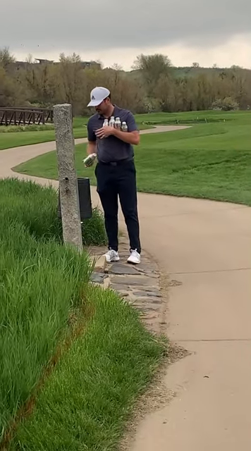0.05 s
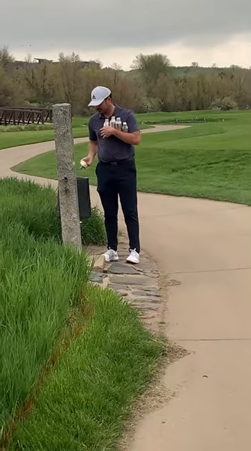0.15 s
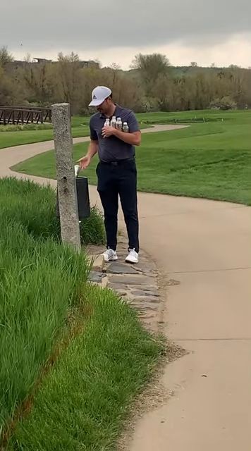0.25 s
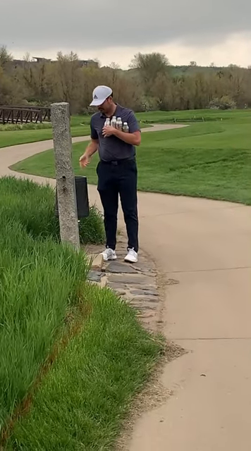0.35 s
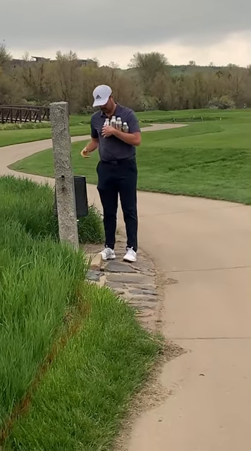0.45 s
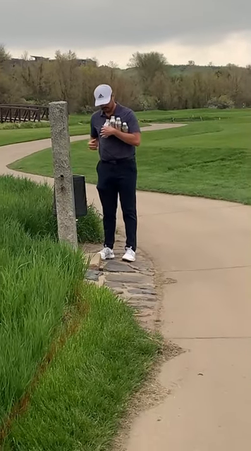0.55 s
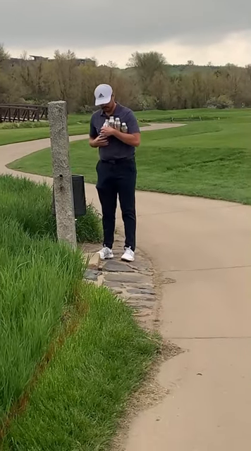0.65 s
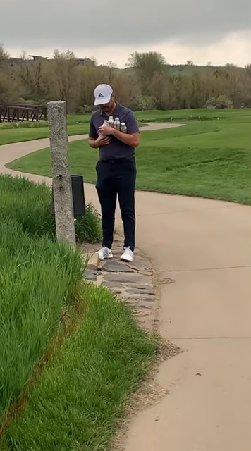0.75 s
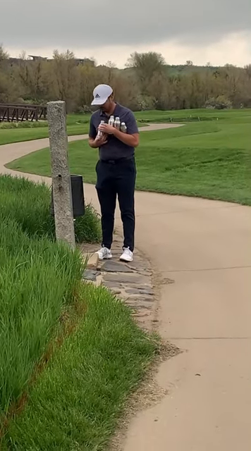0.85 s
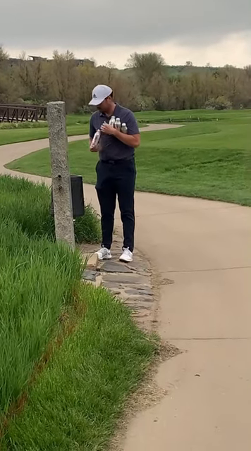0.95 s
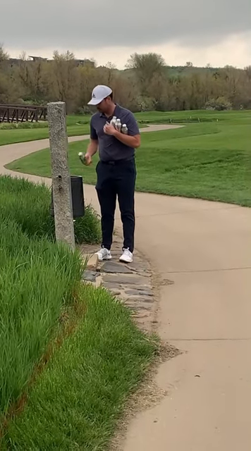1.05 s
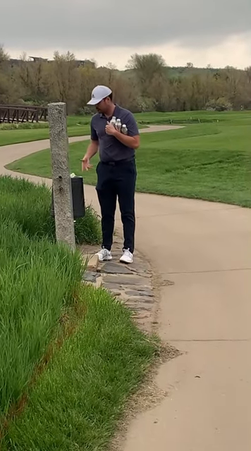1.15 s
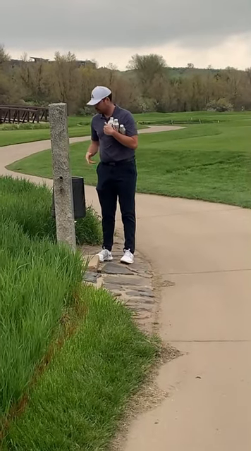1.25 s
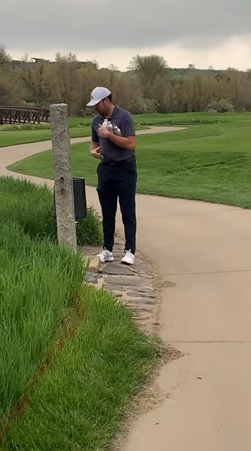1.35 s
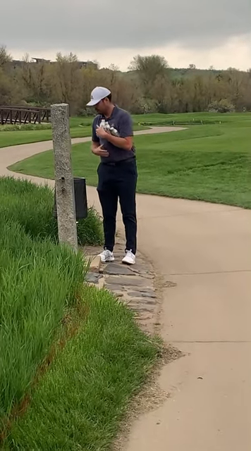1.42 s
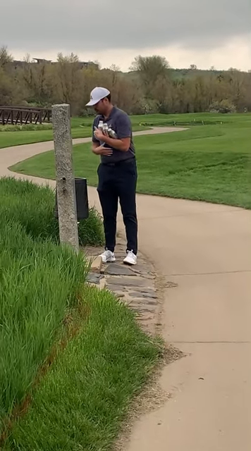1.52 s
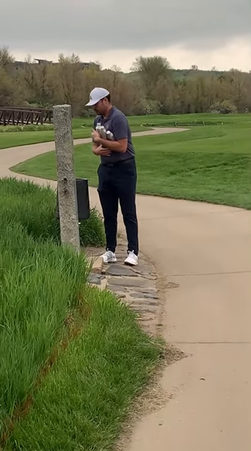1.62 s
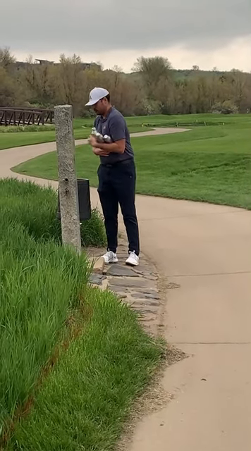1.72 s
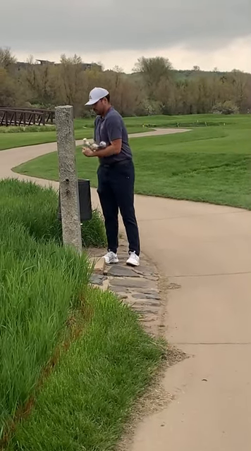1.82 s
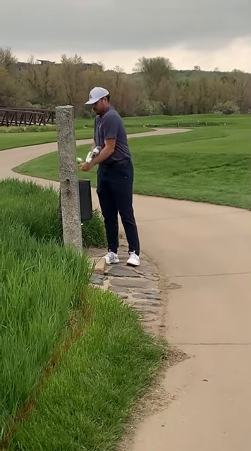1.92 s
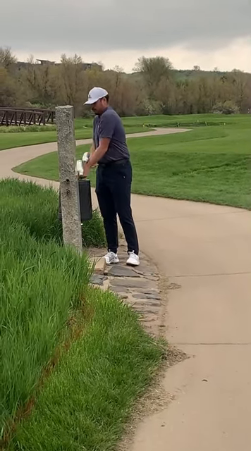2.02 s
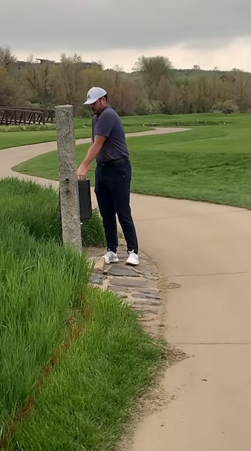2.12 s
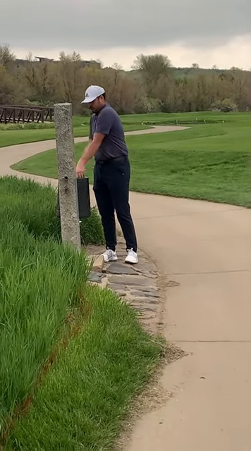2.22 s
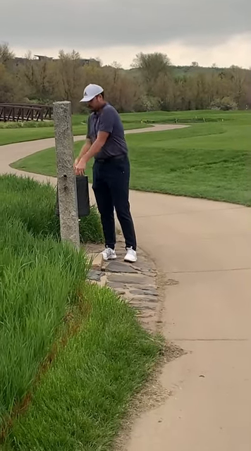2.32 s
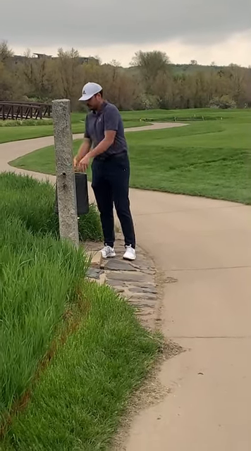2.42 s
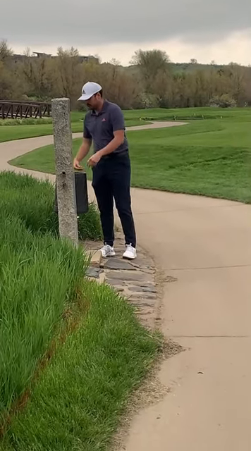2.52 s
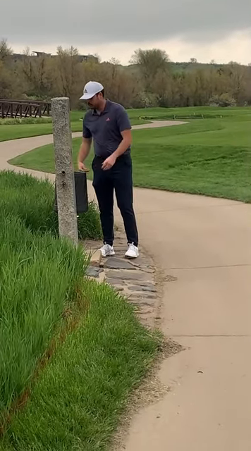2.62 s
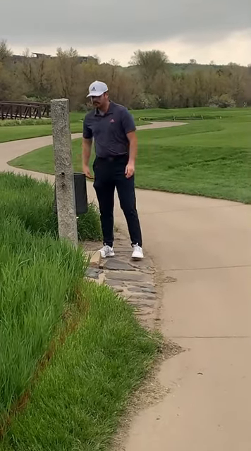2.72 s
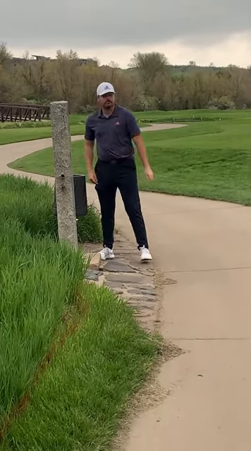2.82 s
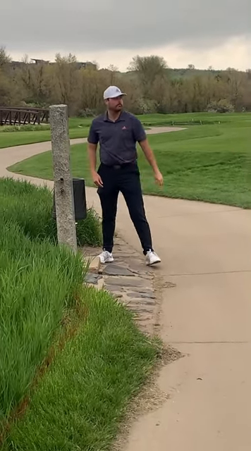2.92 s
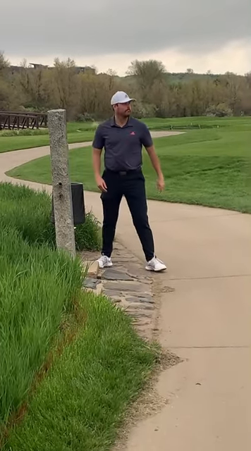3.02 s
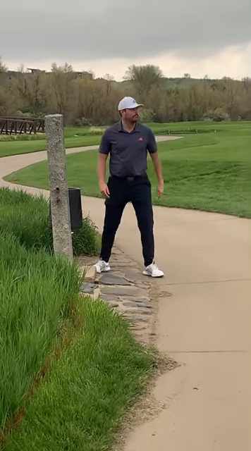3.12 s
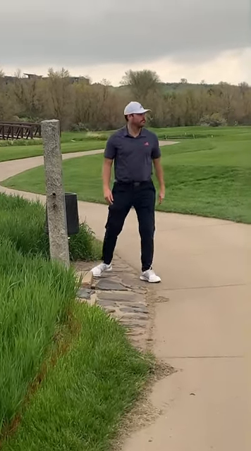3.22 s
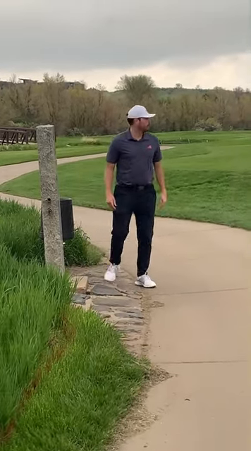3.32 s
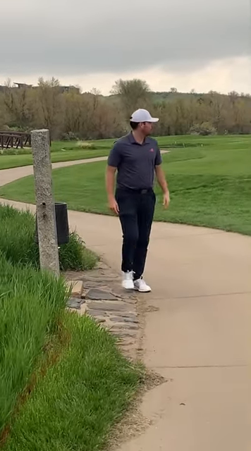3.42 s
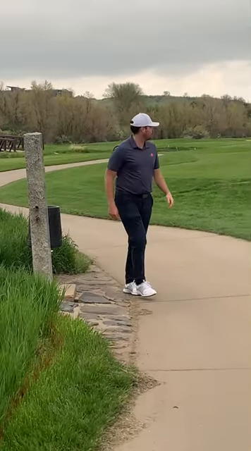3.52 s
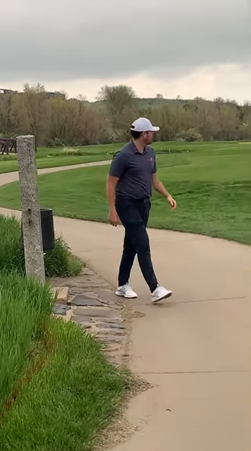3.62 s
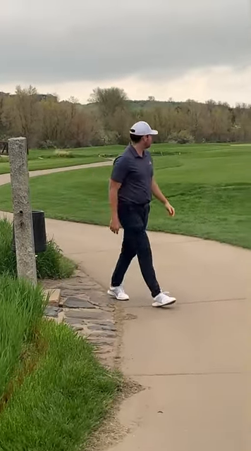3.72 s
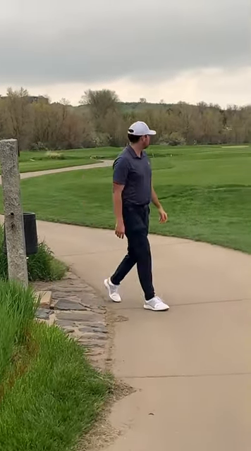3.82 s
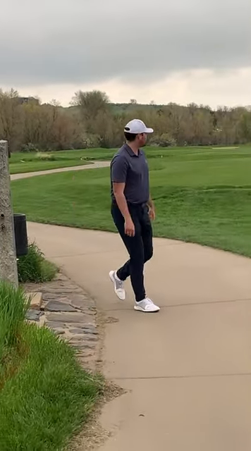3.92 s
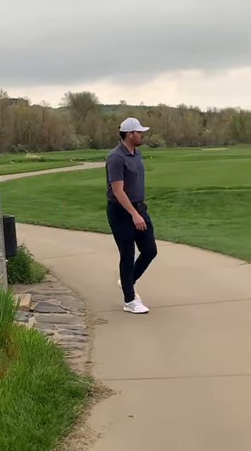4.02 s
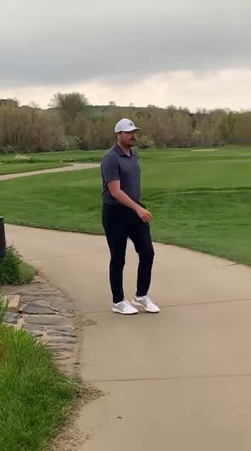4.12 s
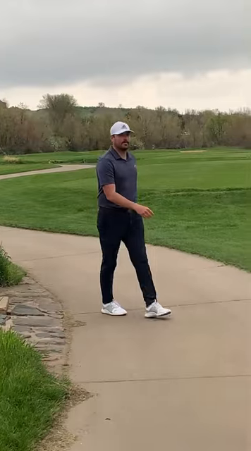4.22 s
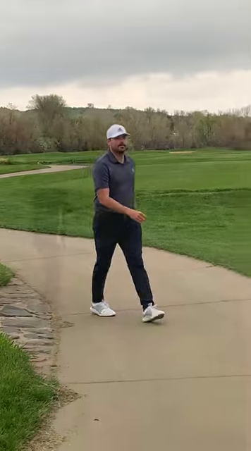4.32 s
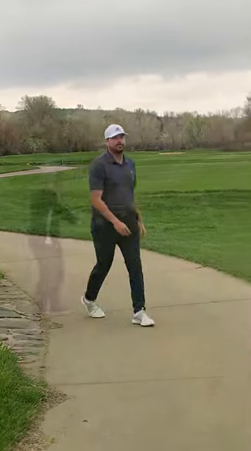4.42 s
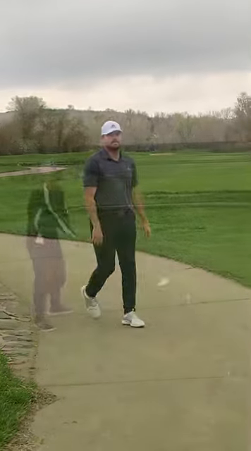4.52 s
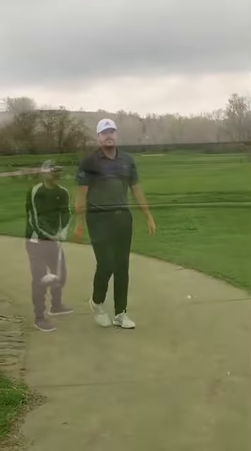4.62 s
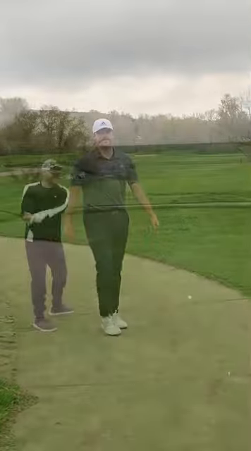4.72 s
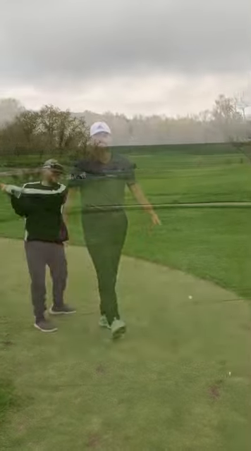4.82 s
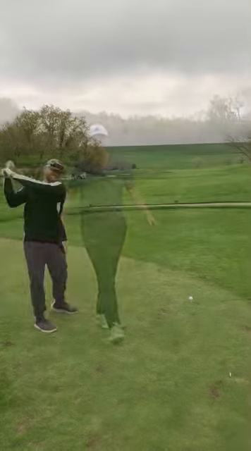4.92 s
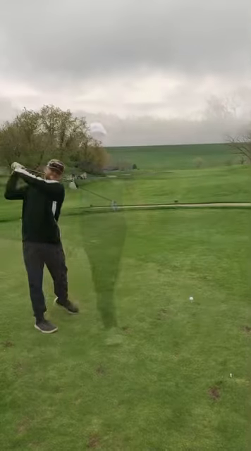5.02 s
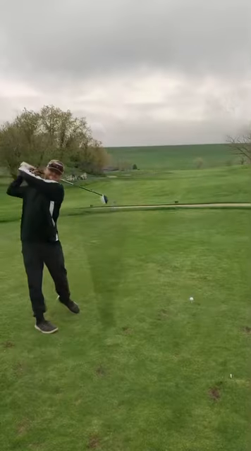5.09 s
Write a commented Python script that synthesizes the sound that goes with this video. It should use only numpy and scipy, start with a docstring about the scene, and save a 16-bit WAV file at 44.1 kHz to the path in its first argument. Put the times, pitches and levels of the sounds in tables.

```python
"""Empty plastic bottles drop into a litter bin on a post, a few metres from a phone, on open grass.
From the start to about 3 s, contact noise rings bottle walls and the bin's hollow, then rattles and slides on.
Gliding tones make birds that call from 0.4 s on, joined by a warble at 2.6 s, a trill at 3 s, chirps at 3.8 s.
At 4.1 s grit noise makes a shoe scuff the path; a soft hiss of filtered noise swells near 4.8 s.
Bands of noise make a low rumble and wind in far trees all along; they fade from 4.18 s on."""
import sys
import numpy as np
from scipy import signal
from scipy.fft import rfft, irfft, next_fast_len
from scipy.io import wavfile
from scipy.ndimage import uniform_filter1d

SR = 44100
rng = np.random.default_rng(int(sys.argv[2]) if len(sys.argv) > 2 else 0)


def file_out(sig):
    """Save sig as 16-bit WAV at sys.argv[1]."""
    # one column per channel
    cols = np.atleast_2d(sig).T
    # limit, then scale
    lim = np.clip(cols, -1, 1)
    pcm = np.round(lim * 32767).astype(np.int16)
    wavfile.write(sys.argv[1], SR, pcm)


N = 227237

# Rumble and far wind. Each row: pitch in Hz, relative level in dB per Hz,
# share that is alike at both ports (0 to 1).
AIR_BANDS = [(21, -2, 1), (39.2, -4.5, 1), (63.2, 3, 1), (129, -7, 0.99), (189.1, -18, 0.98),
             (418, -29.5, 0), (890, -21.5, 0.17), (1790, -37.5, 0.1), (3000, -39.5, 1), (4300, -53, 1),
             (8360, -54, 0.93), (16000, -57, 1)]
AIR_DB, AIR_SWELL_DB, AIR_FLICKER_DB = -50.5, .8, 1.54
FADE_START_S, WIND_FADE_DB_PER_S, RUMBLE_FADE_DB_PER_S = 4.18, -2, -13

# How far the left microphone port leads the right. Each row: pitch in Hz, lead in radians.
PORT_LEAD = [(0, 0), (1290, -0.2), (2580, 1.7), (3790, 1.4), (6370, 6.0), (7490, 6.7), (8350, 9.1),
             (9560, 9.8), (10400, 12.4), (11600, 12.8), (12500, 15.5), (13700, 15.8), (14600, 18.8),
             (16000, 18.9)]
TOP_HZ = 16000  # the phone cuts what lies above

# Two broad resonances of the soft hiss. Each row: pitch in Hz, width in Hz, relative level in dB.
HISS_BANDS = [(3120, 500, -2.5), (1710, 470, -3.5)]
HISS_CENTRE_S, HISS_SPREAD_S, HISS_DB = 4.79, 0.1, -64

# Bird notes, each one smooth glide. Each row: start in seconds, length in seconds, first pitch in Hz,
# middle pitch in Hz, last pitch in Hz, level in dB before flutter, distance and echo.
WHISTLES = [(0.4, 0.049, 2318, 2240, 2190, -74), (0.81, 0.12, 3110, 3040, 2980, -85),
            (0.966, 0.029, 3700, 3540, 3570, -82), (0.885, 0.092, 2720, 2550, 2370, -72.5),
            (1.031, 0.049, 2550, 2540, 2110, -76), (1.32, 0.03, 2900, 2860, 3010, -67),
            (1.375, 0.033, 2678, 2600, 2330, -70), (1.411, 0.049, 4130, 4050, 3960, -85),
            (1.488, 0.038, 2680, 2550, 2240, -72), (1.541, 0.1, 2347, 2410, 2250, -75.5),
            (1.628, 0.038, 2400, 2610, 2850, -70), (1.674, 0.067, 2820, 2680, 2220, -68.5),
            (1.745, 0.059, 3205, 3190, 3150, -69), (2.458, .05, 3140, 3700, 3200, -61),
            (2.577, 0.053, 3080, 3540, 3890, -61), (2.81, .06, 2490, 2350, 2190, -64),
            (2.953, 0.058, 5400, 6050, 5400, -62), (2.975, 0.043, 2480, 2740, 2040, -54.5),
            (3.024, 0.022, 2080, 2065, 1900, -65.5), (3.105, 0.057, 4300, 4800, 4700, -77),
            (3.205, 0.037, 2040, 3190, 2300, -65.5), (3.22, 0.029, 4500, 4840, 4540, -76),
            (3.344, 0.068, 4250, 4660, 4700, -81.5), (3.377, 0.018, 3520, 3000, 2700, -73),
            (3.383, 0.14, 2594, 2394, 2650, -61.5), (3.525, .07, 2770, 2970, 3200, -74),
            (3.572, 0.08, 2360, 2370, 2240, -71.5), (3.698, 0.11, 2300, 2155, 2410, -70),
            (4.118, 0.0394, 2980, 3398, 3550, -59.5), (4.35, 0.045, 2240, 2290, 2040, -75),
            (4.472, 0.051, 2350, 2750, 2130, -71), (4.525, 0.062, 2200, 1900, 1850, -73),
            (4.566, .06, 3750, 3600, 3750, -88.5), (4.921, 0.065, 4550, 4950, 3900, -79),
            (5.016, 0.069, 3370, 3215, 2920, -62.5), (5.117, 0.048, 2300, 2810, 2850, -65.5)]
# Chirps with overtones. Each row: the same columns as the whistles; the pitches are of the second partial.
CHIRPS = [(3.789, .065, 2993, 3750, 3030, -63.5), (3.999, .06, 3030, 3566, 3050, -62.5)]
# Partials of a chirp. Each row: multiple of the given pitch, level in dB.
CHIRP_PARTIALS = [(.5, -14), (1, 0), (1.5, -8)]
# Warbles of a far bird. Each row: start in seconds, length in seconds, middle pitch in Hz,
# level in dB before flutter, distance and echo.
WARBLES = [(2.615, 0.38, 2538, -71), (3.04, 0.31, 2550, -77.5)]
WARBLE_SWING_HZ, WARBLE_SWINGS_PER_S = 112, 40
WARBLE_PARTIALS = ((1, 0), (1.14, -7.5))  # multiple of the pitch, level in dB
NOTE_SWELL_POWER = 0.33  # 0 = flat note, 1 = sine arch
FAR_HZ = 4300  # whistles with a middle pitch above this come from far off
TRILL_START_S, TRILL_GAP_S, TRILL_COUNT = 3.04, .0647, 12
TRILL_HZ = (4200, 3300, 3650)  # first, middle and last pitch of a note, before a small random shift
TRILL_NOTE_S, TRILL_DB, TRILL_SPREAD_DB = .034, -71, 2  # average length and level, random spread
FLOCK_PER_S, FLOCK_END_S = 16, 3.95
FLOCK_HZ, FLOCK_MIN_DB = (2300, 4200), -86  # range of pitches; level of the softest call
NEAR_FLUTTER_DB, FAR_FLUTTER_DB, BIRD_ECHO_S = 1.2, 3.6, 0.023

# Shoe strokes on the path. Each row: start in seconds, attack in seconds, hold in seconds,
# release in seconds, grit level in dB before the sole's resonances.
SCUFF_STROKES = [(4.125, 0.016, 0.01, 0.022, -39.5), (4.17, .01, 0.057, 0.016, -51.5)]
# The loudest stones under the shoe. Each row: time in seconds, noise level in dB before the sole's resonances.
STONES = [(4.162, -27.5), (4.186, -41), (4.212, -48), (4.238, -52.5)]
# Resonances of the sole. Each row: pitch in Hz, width in Hz, level in dB.
SOLE = [(190, 103, 9.5), (640, 130, 6.5), (1200, 160, 4.5), (1710, 154, 10.5), (2620, 140, 3),
        (6600, 2500, -37), (11900, 9800, -30)]

# Thin dry ticks. Each row: time in seconds, peak in dB, centre pitch in Hz.
TICKS = [(0.559, -43.5, 4940), (0.846, -60.5, 3930), (0.993, -61, 2640), (1.915, -60.5, 7200),
         (3.697, -58, 4980), (4.745, -63, 5100), (4.915, -64, 5000)]
TICK_S = 0.0012  # time to the top of a tick's envelope

# Bottles sliding over each other. Each row: start in seconds, hold in seconds, wall level in dB,
# crackle level in dB relative to the walls.
SLIDES = [(0.553, 0.086, -57.5, -14), (1.192, 0.056, -68.5, 23), (1.911, 0.15, -60, -31),
          (2.086, 0.15, -52.5, 6.5), (2.225, 0.14, -49.5, -3), (2.399, 0.12, -51, 2),
          (2.524, 0.044, -78, -1), (2.611, 0.11, -58, -3), (2.77, 0.12, -68, -10)]
SLIDE_ATTACK_S, SLIDE_RELEASE_S, SLIDE_CRACKLE_S = 0.0073, .05, 0.028
SLIDE_RING_SHARE = 0.31  # contact shortens the ring of the walls to this share

# Knocks. Each row: time in seconds, early peak of the bottle walls in dB, bin boom in dB, crack in dB,
# brightest bottle pitch in Hz, rattle in dB, hardness in dB per octave. Boom and crack are relative
# to the wall peak, the rattle to the first contact.
KNOCKS = [(0.009, -33, -6.5, -15, 666, -8, 2.5), (0.053, -39, -0.5, -50, 550, -1.5, 2),
          (0.205, -38.5, -11, -30, 1100, 4, -17), (0.312, -24.5, -8.5, -10.5, 855, -10, -0.5),
          (0.372, -31, -20, -25.5, 1060, -12.5, -3), (0.457, -33.5, -15, -46, 605, -4, -1),
          (0.526, -39.5, -0.5, -9, 760, -19, 7), (0.537, -40, -9.5, -14, 590, 8.5, 9.5),
          (0.56, -33, -7, -12.5, 1080, 5, -11), (0.599, -35, -8, -53, 805, 5, 6.5),
          (0.646, -40, -6.5, -49, 1080, -3, -8), (0.705, -47.5, -1, -25, 710, -9, -13),
          (0.868, -45.5, -17, -7.5, 900, -15, 9.5), (1.154, -23.5, -18.5, -7.5, 810, -8, 3),
          (1.178, -22.5, -23, -9, 1020, -11, 6), (1.195, -21, -45, -6.5, 700, -6, 0.5),
          (1.209, -22, -12, 0, 600, -11, 5.5), (1.234, -30.5, -30, -30, 980, -5.5, -10),
          (1.27, -41.5, 3.5, -30, 1010, -3, 6), (1.336, -39, -22, -20, 970, -4, -8),
          (1.603, -43, -17, -16.5, 1130, 1.5, 2), (1.734, -34.5, -18, -22.5, 990, -13.5, -2),
          (1.764, -40, -30, -21, 940, 16, 7), (1.94, -45.5, -12, -32, 1180, 5, 17.5),
          (2.007, -24, -11, -18.5, 667, -18, -12), (2.091, -32, -14, 1, 1200, -4, 19),
          (2.109, -20.5, -13, -12, 1250, -17, 5.5), (2.124, -27, -13, -4, 717, 6, 5),
          (2.162, -22.5, -8, -3.5, 690, -1, 2.5), (2.178, -32, 4.5, -0.5, 557, -3, 11),
          (2.226, -30, -11, -22, 750, -13, 5.5), (2.255, -33, -38, -3, 780, -9, 7.5),
          (2.271, -27.5, -38, -7, 1110, -12, 10), (2.288, -30, -4, -11, 1070, -3, -13),
          (2.309, -30.5, -3, -15.5, 1090, -8.5, -3.5), (2.352, -38, -0.5, -14, 685, -1, 6),
          (2.407, -21.5, -48, -19, 663, -11, 0.5), (2.424, -32.5, -2, -8, 1280, -15, 8.5),
          (2.462, -35, -20, -39, 700, 5.5, -11), (2.491, -36, 0.5, -49, 1120, -10, 0),
          (2.633, -40.5, 1.5, -11, 980, -4, 13), (2.689, -41, -9, -21.5, 1176, 6, 8),
          (2.851, -37, -4, -23, 1030, -7.5, 5)]
# Ringing modes of the bottle walls. Each row: pitch in Hz, level in dB, time to fall by 60 dB in seconds.
# Every knock shifts pitch and level a little.
BOTTLE_MODES = [(590, -10.5, 0.14), (698, 0.5, 0.036), (802, -5, 0.1), (988, 1, 0.045), (1084, 6.5, 0.023),
                (1228, -1.5, 0.028), (1544, -2.5, 0.022), (1727, -2, 0.042), (2275, -5.5, 0.013),
                (2680, -8.5, 0.037), (3150, -18.5, 0.096), (3770, -33, 0.078)]
# Ringing modes of the bin's hollow. Each row: pitch in Hz, level in dB, time to fall by 60 dB in seconds.
BIN_MODES = [(157.05, 14, 0.4), (254.6, 1, 0.23), (325, -22, .08)]
PEAK_WINDOW = SR // 70  # samples at the start of a knock that set its peak
OWN_PITCH_DB, OWN_PITCH_WIDTH = 9, 0.089  # lift near a bottle's own pitch; width in natural-log pitch
CONTACT_S, RATTLE_RISE_S, RATTLE_S, CRACK_S = 0.0031, 0.0044, 0.036, 0.077
MODE_SPREAD_DB, MODE_SHIFT = 3.36, 0.046  # random spread of level, and of pitch as a share


def undb(db):
    """Turn decibels into a plain factor."""
    return 10 ** (np.asarray(db) / 20)


def unit(x):
    """Scale to an average (RMS) strength of 1."""
    return x / np.sqrt(np.mean(x ** 2))


def ring(x, hz, t60):
    """One mode, struck by x, that falls by 60 dB in t60 seconds."""
    pole = np.exp((2j * np.pi * hz - np.log(1000) / max(t60, .003)) / SR)
    return signal.lfilter([1], [1, -pole], x).imag


def band(x, hz, width):
    """Resonance with gain 1 at its centre."""
    return signal.lfilter(*signal.iirpeak(hz, hz / width, fs=SR), x)


def walk(rate):
    """Slow random curve: levels held for 1 / rate seconds and smoothed twice; spread near 1."""
    k = int(SR / rate)
    steps = np.repeat(rng.standard_normal(N // k + 1), k)
    return unit(uniform_filter1d(uniform_filter1d(steps, k), k)[:N])


def add(out, s, x):
    """Mix x into out from second s on."""
    i = int(s * SR)
    out[i:i + len(x)] += x[:N - i]


def grit(size, spread_db):
    """Dense tiny contacts with a few big ones."""
    return unit(rng.standard_normal(size) * undb(spread_db * rng.exponential(size=size)))


def shape(s, attack_s, hold_s, release_s):
    """Straight rise, hold, exponential release."""
    t = np.arange(N) / SR - s
    return np.clip(t / attack_s, 0, 1) * np.exp(-np.maximum(t - attack_s - hold_s, 0) / release_s)


def echoes(x, decay_s):
    """Scattering off trees: x smeared by a decaying burst of noise."""
    t = np.arange(SR // 4) / SR
    tail = rng.standard_normal(len(t)) * np.exp(-t / decay_s)
    return signal.fftconvolve(x, tail / np.linalg.norm(tail))[:N]


def ports(x, side=1.):
    """Both microphone ports hear one wave, the left one earlier in the treble; side scales the lead."""
    hz, lead = np.transpose(PORT_LEAD)
    size = next_fast_len(N + 4096)
    bins_hz = np.arange(size // 2 + 1) * SR / size
    turn = np.exp(.5j * side * np.interp(bins_hz, hz, lead))
    return irfft(rfft(x, size) * np.array([turn, turn.conj()]), size)[:, :N]


def air():
    """Rumble and wind: half-octave noise bands swell together and flicker alone, partly shared by the ports."""
    shared, apart, swell = 0, 0, walk(1.685)
    fading_s = np.maximum(np.arange(N) / SR - FADE_START_S, 0)
    table = np.array(AIR_BANDS, float)
    for hz in 22 * 2 ** np.arange(0, 9.6, .5):
        db, alike = (np.interp(np.log(hz), np.log(table[:, 0]), table[:, k]) for k in (1, 2))
        alike = np.clip(alike, 0, 1)
        noise = band(band(rng.standard_normal((3, N)), hz, hz / 2), hz, hz / 2)
        fade = RUMBLE_FADE_DB_PER_S if hz < 250 else WIND_FADE_DB_PER_S
        noise = noise * undb(db + AIR_SWELL_DB * swell + AIR_FLICKER_DB * walk(8) + fading_s * fade)
        shared = shared + np.sqrt(alike) * noise[0]
        apart = apart + np.sqrt(1 - alike) * noise[1:]
    return unit(ports(shared) + apart) * undb(AIR_DB)


def hiss():
    """Soft noise in two broad resonances, swelling and fading as a bell curve."""
    noise = rng.standard_normal(N)
    tone = unit(sum(undb(db) * band(band(noise, hz, w), hz, w) for hz, w, db in HISS_BANDS))
    swell = np.exp(-.5 * ((np.arange(N) / SR - HISS_CENTRE_S) / HISS_SPREAD_S) ** 2)
    return tone * undb(HISS_DB) * swell


def note(length_s, first_hz, mid_hz, last_hz, db, partials=((1, 0),), swing_hz=0, per_s=0):
    """A whistle on a parabola through three pitches; it swells and fades."""
    u = np.linspace(0, 1, int(length_s * SR))
    hz = np.polyval(np.polyfit((0, .5, 1), (first_hz, mid_hz, last_hz), deg=2), u)
    hz = hz + swing_hz * np.sin(2 * np.pi * per_s * length_s * u)
    phase = 2 * np.pi * np.cumsum(hz) / SR
    swell = np.abs(np.sin(np.pi * u)) ** NOTE_SWELL_POWER
    return np.sqrt(2) * swell * undb(db) * sum(undb(g) * np.sin(k * phase) for k, g in partials)


def trill(far):
    """A row of evenly spaced notes that glide down, then up, each a little different."""
    for k, (a, b, c) in enumerate(rng.standard_normal((TRILL_COUNT, 3))):
        pitches = np.multiply(TRILL_HZ, 1 + 0.0314 * b)
        x = note(TRILL_NOTE_S * (1 + .15 * a), *pitches, TRILL_DB + TRILL_SPREAD_DB * c)
        add(far, TRILL_START_S + k * TRILL_GAP_S, x)


def flock(far):
    """Far birds: short calls that end lower, at random times and pitches."""
    for when, pitch, longer, size in rng.random((int(FLOCK_PER_S * FLOCK_END_S), 4)):
        hz = np.interp(pitch, (0, 1), FLOCK_HZ)
        x = note(.03 + .021 * longer, hz, hz * 1.01, hz * .95, FLOCK_MIN_DB + 8 * size)
        add(far, when * FLOCK_END_S, x)


def birds():
    """Gliding whistles and chirps with some echo; high whistles, warbles, trill and flock far off and blurred."""
    near, far = np.zeros(N), np.zeros(N)
    for s, length_s, first_hz, mid_hz, last_hz, db in WHISTLES:
        add(far if mid_hz > FAR_HZ else near, s, note(length_s, first_hz, mid_hz, last_hz, db))
    for s, *row in CHIRPS:
        add(near, s, note(*row, CHIRP_PARTIALS))
    for s, length_s, hz, db in WARBLES:
        x = note(length_s, hz, hz, hz, db, WARBLE_PARTIALS, WARBLE_SWING_HZ, WARBLE_SWINGS_PER_S)
        add(far, s, x)
    trill(far)
    flock(far)
    # moving air makes the notes flutter, the far ones more
    near = near * undb(NEAR_FLUTTER_DB * walk(90))
    far = far * undb(FAR_FLUTTER_DB * walk(150))
    near_sound = near + undb(-6) * echoes(near, BIRD_ECHO_S)
    far_sound = undb(-5.5) * far + echoes(far, BIRD_ECHO_S)
    return near_sound + far_sound


def scuff():
    """Grit rolls under the sole and rings its resonances; a few stones snap louder."""
    push = grit(N, 3.6) * sum(shape(*row) * undb(db) for *row, db in SCUFF_STROKES)
    rise = np.arange(600) / SR / 0.0019
    for s, db in STONES:
        add(push, s - .002, undb(db) * rng.standard_normal(600) * rise * np.exp(1 - rise))
    return sum(undb(db) * band(push, hz, w) for hz, w, db in SOLE)


def ticks():
    """Short bursts of noise through one wide resonance."""
    out, t = np.zeros(N), np.arange(SR // 40) / SR
    for s, db, hz in TICKS:
        x = band(rng.standard_normal(len(t)) * t * np.exp(-t / TICK_S), hz, 0.51 * hz)
        add(out, s - TICK_S, undb(db) * x / np.abs(x).max())
    return out


def slides():
    """Uneven scraping through the same bottle walls, heavily damped by contact; the crackle dies early."""
    push = grit(N, 1.95) * undb(2.8 * walk(59.83))
    walls = unit(sum(undb(g) * ring(push, f, SLIDE_RING_SHARE * t60) for f, g, t60 in BOTTLE_MODES))
    crackle = unit(band(push, 4330, 2800) + undb(-37) * band(push, 15000, 9000))
    out = np.zeros(N)
    for s, hold_s, db, crackle_db in SLIDES:
        scrape = shape(s, SLIDE_ATTACK_S, hold_s, SLIDE_RELEASE_S) * walls
        bright = shape(s, SLIDE_ATTACK_S, 0, SLIDE_CRACKLE_S) * crackle
        out += undb(db) * (scrape + undb(crackle_db) * bright)
    return out


def bottle_walls(push, own_hz, hard_db):
    """Modes near the struck bottle's own pitch speak most; a harder blow lifts the high ones."""
    walls = 0
    chance = rng.standard_normal((len(BOTTLE_MODES), 2))
    for (hz, db, t60), (louder, higher) in zip(BOTTLE_MODES, chance):
        own_db = OWN_PITCH_DB * np.exp(-(np.log(hz / own_hz) / OWN_PITCH_WIDTH) ** 2)
        gain_db = db + MODE_SPREAD_DB * louder + hard_db * np.log2(hz / own_hz) + own_db
        walls = walls + undb(gain_db) * ring(push, hz * (1 + MODE_SHIFT * higher), t60)
    return walls


def knocks():
    """A few ms of contact, then uneven small bounces, drive walls and crackle; a thud rings the bin's hollow."""
    out, t = np.zeros(N), np.arange(SR // 3) / SR
    rise = t / CONTACT_S
    contact = rise * np.exp(1 - rise)
    thud = t / .0012 * np.exp(-t / 0.00044)
    boom = sum(undb(g) * ring(thud, f, t60) for f, g, t60 in BIN_MODES)
    for s, db, boom_db, crack_db, own_hz, rattle_db, hard_db in KNOCKS:
        bounces = uniform_filter1d(np.repeat(rng.exponential(size=len(t) // 150) ** .7, 150), 100)
        rattle = undb(rattle_db) * bounces * (1 - np.exp(-t / RATTLE_RISE_S)) * np.exp(-t / RATTLE_S)
        push = grit(len(t), 2.73) * (contact + rattle)
        walls = bottle_walls(push, own_hz, hard_db)
        # the crackle gets its own decay
        crack = (band(push, 7060, 4800) + undb(-12.5) * band(push, 16400, 9000)) * np.exp(-t / CRACK_S)
        parts = ((walls, 0), (boom, boom_db), (crack, crack_db))
        knock = sum(undb(db + g) * x / np.abs(x[:PEAK_WINDOW]).max() for x, g in parts)
        add(out, s - .0022, knock)
    return out


def scatter_back(near):
    """Post, ground and bushes scatter a little of every near sound back, differently to each port."""
    t = np.arange(SR // 3) / SR
    scatter = band(rng.standard_normal((2, len(t))) * np.exp(-t / 0.015), 4030, 8800)
    scatter = scatter / np.linalg.norm(scatter[0])
    return undb(-13) * signal.fftconvolve(near[None], scatter, axes=1)[:, :N]


def scene():
    """Near sounds with their scatter, the hiss, the birds and the air, in stereo."""
    near = knocks() + slides() + ticks() + scuff()
    back = scatter_back(near)
    return ports(near + hiss()) + ports(birds(), side=0.55) + back + air()


def record(dry):
    """The phone drops the deepest bass and cuts the top."""
    dry = signal.sosfilt(signal.butter(3, 32, "high", fs=SR, output="sos"), dry)
    return signal.sosfilt(signal.ellip(10, .2, 70, TOP_HZ, fs=SR, output="sos"), dry)


dry = scene()
out = record(dry)
file_out(out)
```